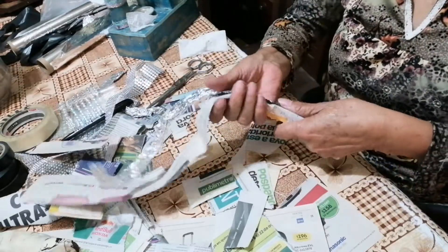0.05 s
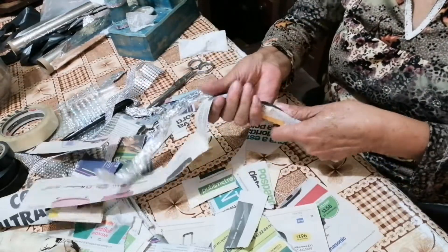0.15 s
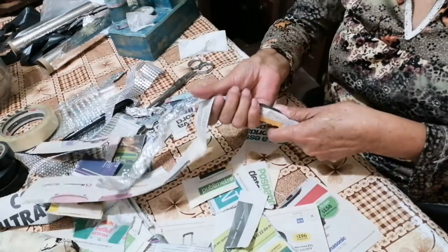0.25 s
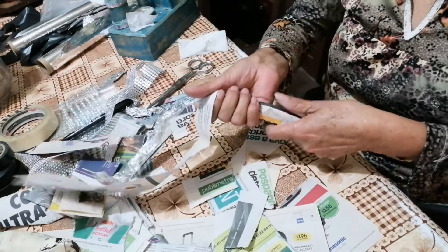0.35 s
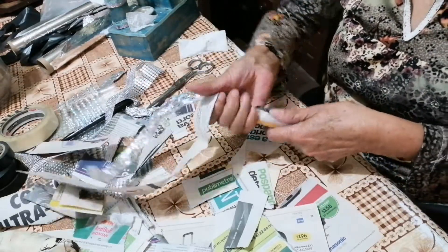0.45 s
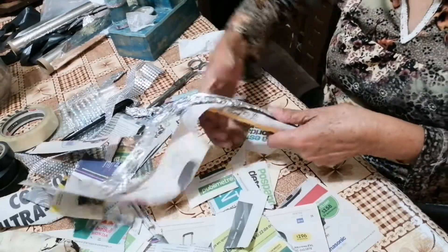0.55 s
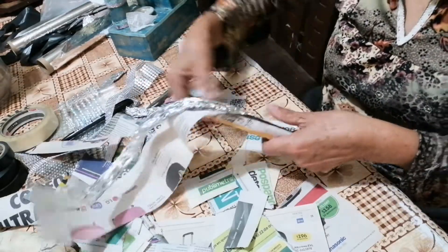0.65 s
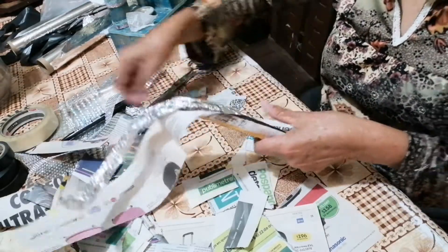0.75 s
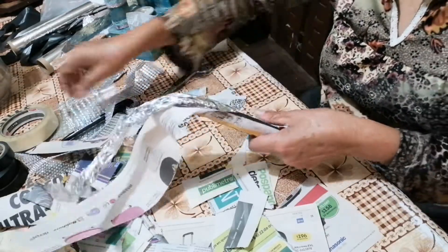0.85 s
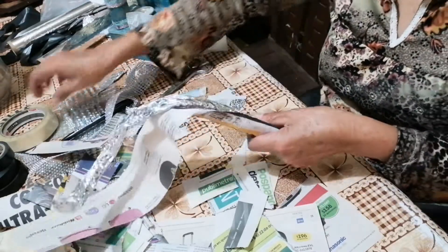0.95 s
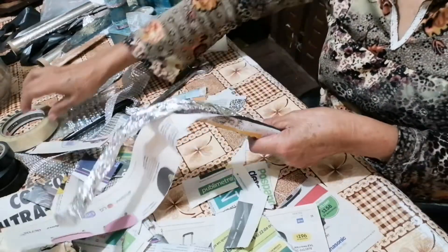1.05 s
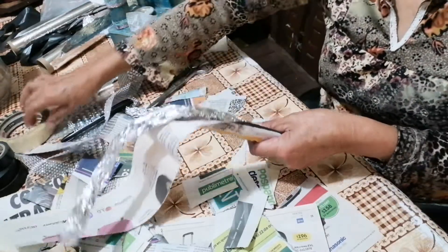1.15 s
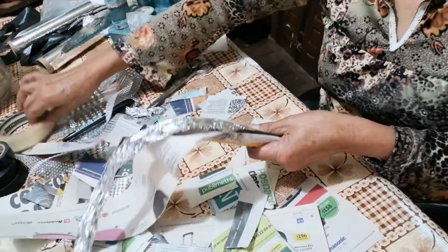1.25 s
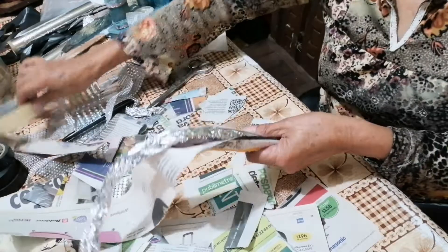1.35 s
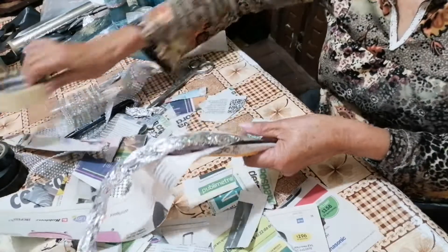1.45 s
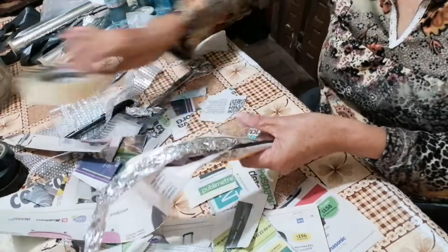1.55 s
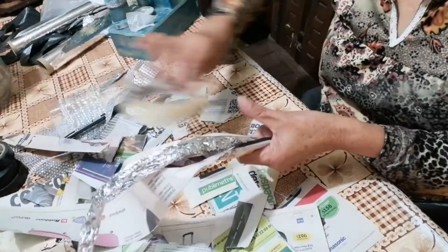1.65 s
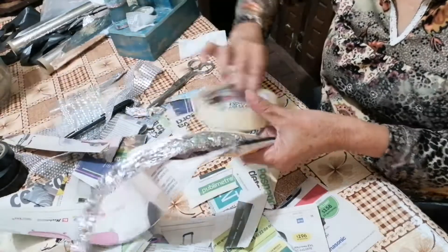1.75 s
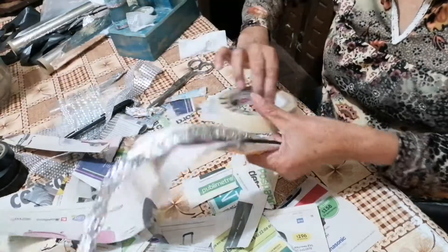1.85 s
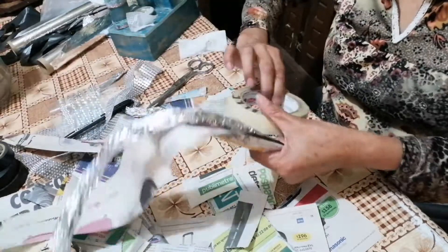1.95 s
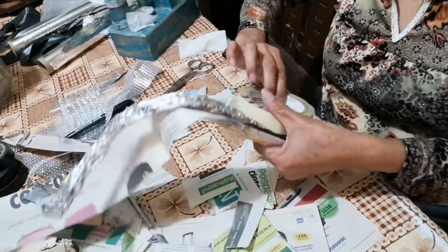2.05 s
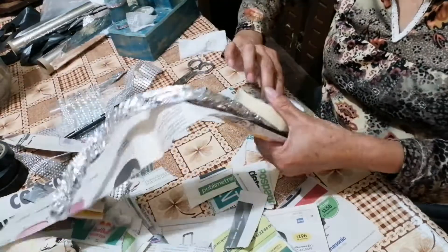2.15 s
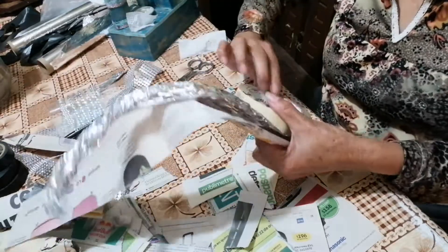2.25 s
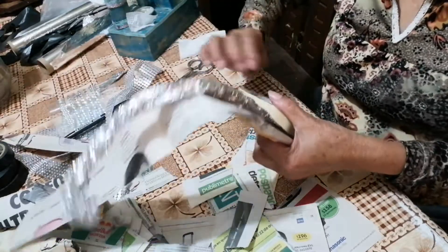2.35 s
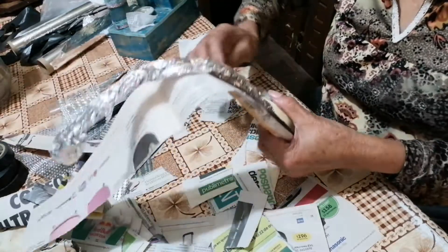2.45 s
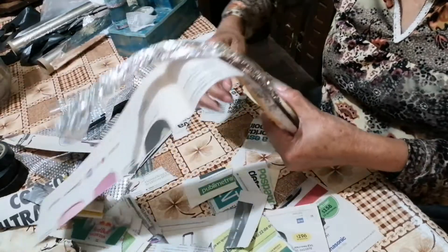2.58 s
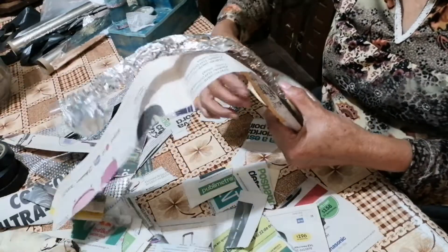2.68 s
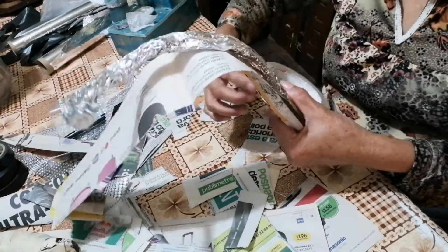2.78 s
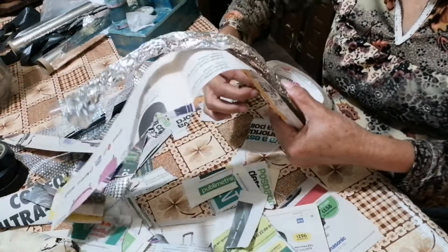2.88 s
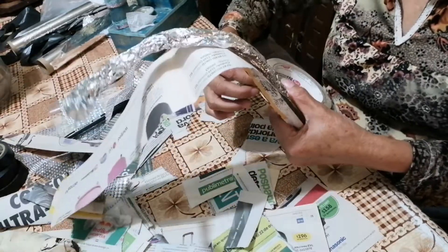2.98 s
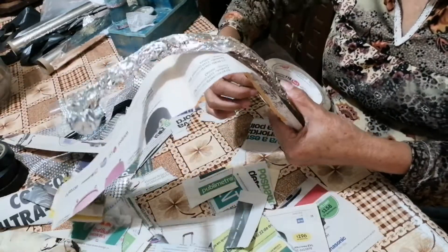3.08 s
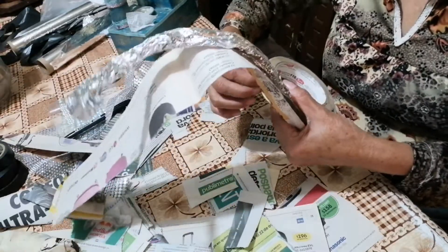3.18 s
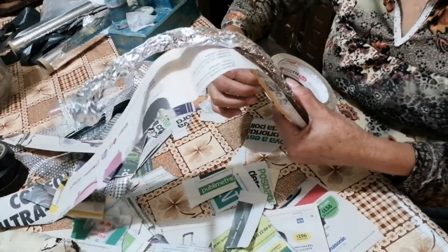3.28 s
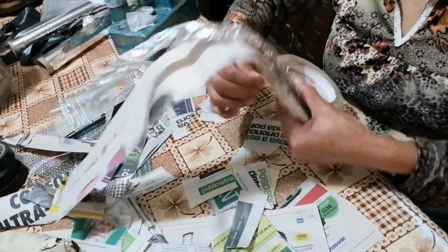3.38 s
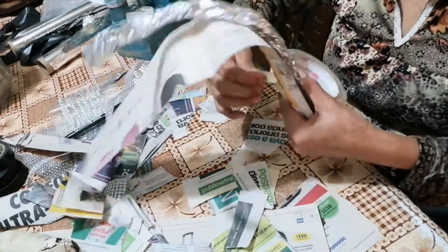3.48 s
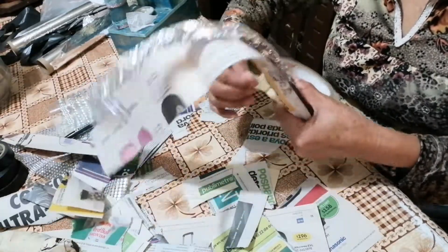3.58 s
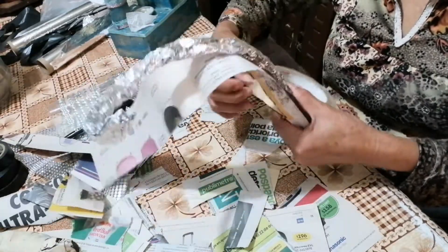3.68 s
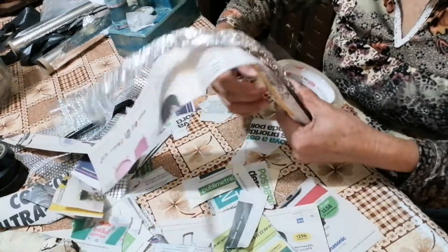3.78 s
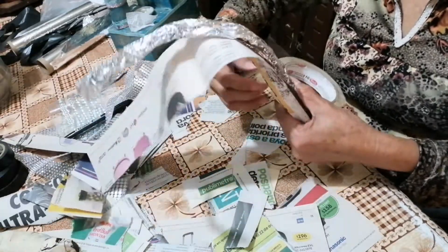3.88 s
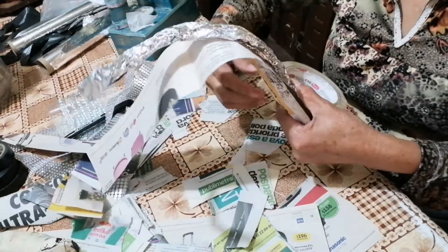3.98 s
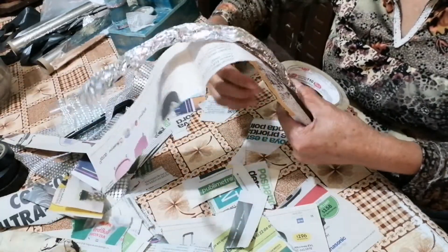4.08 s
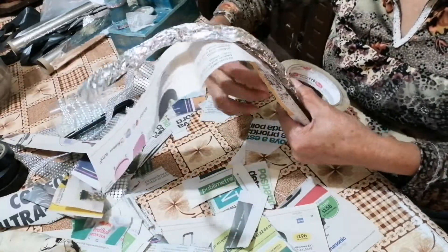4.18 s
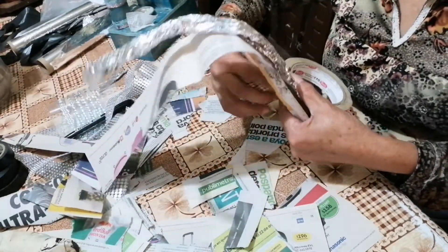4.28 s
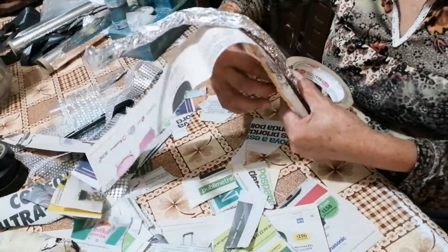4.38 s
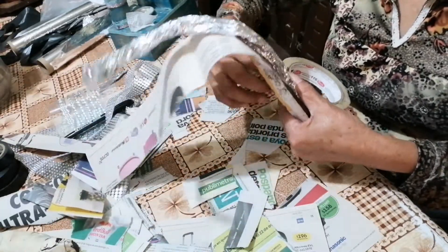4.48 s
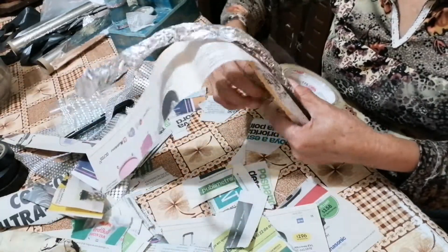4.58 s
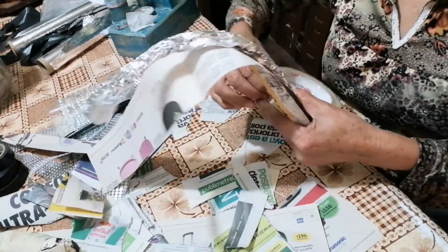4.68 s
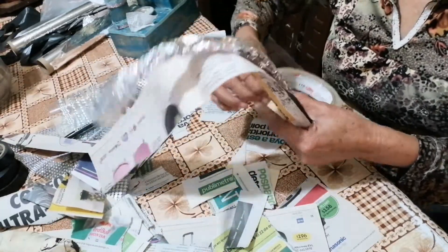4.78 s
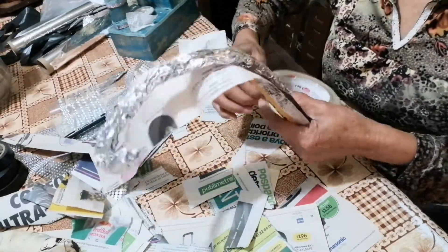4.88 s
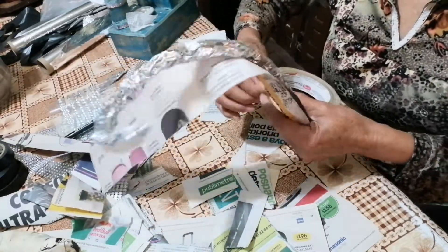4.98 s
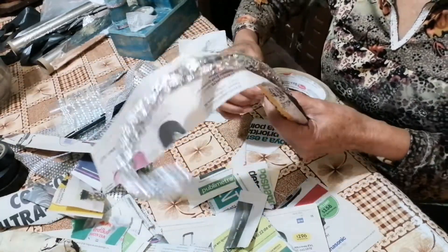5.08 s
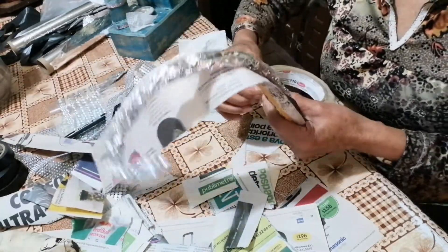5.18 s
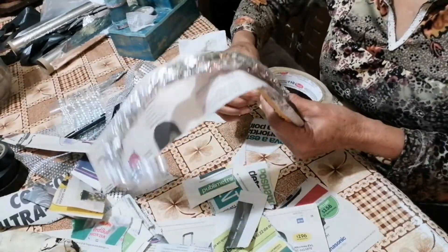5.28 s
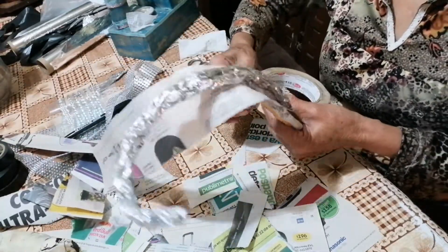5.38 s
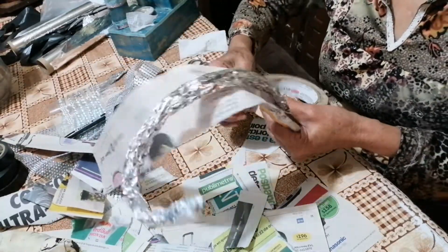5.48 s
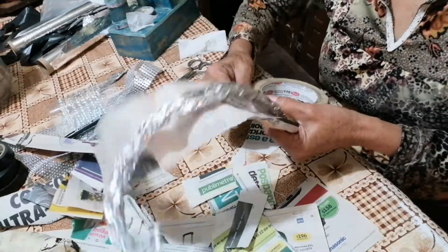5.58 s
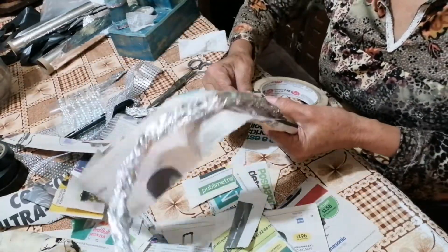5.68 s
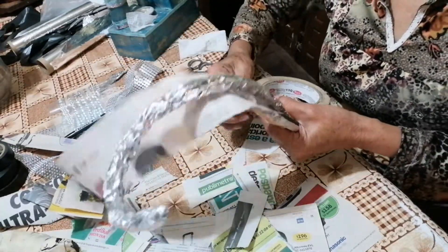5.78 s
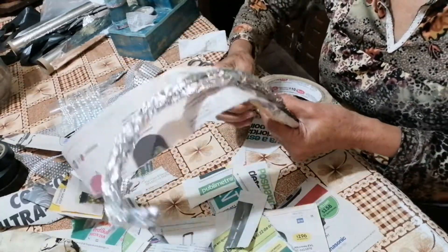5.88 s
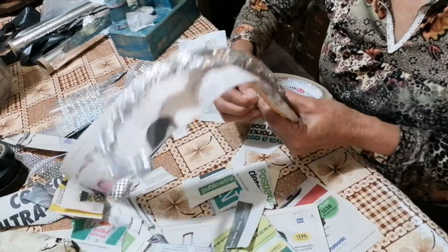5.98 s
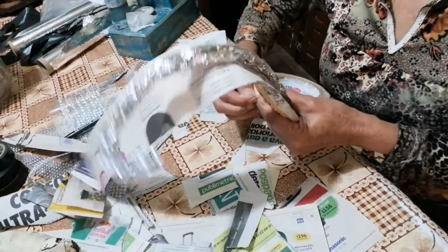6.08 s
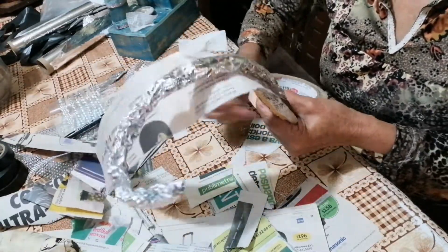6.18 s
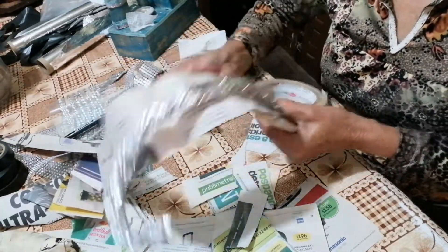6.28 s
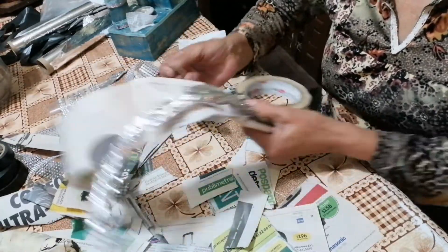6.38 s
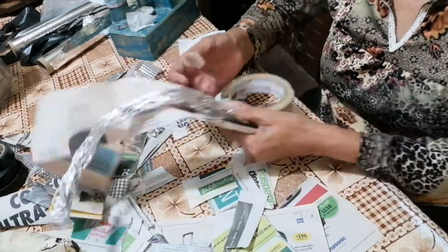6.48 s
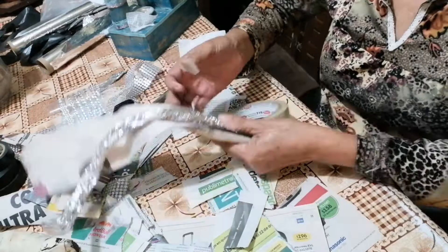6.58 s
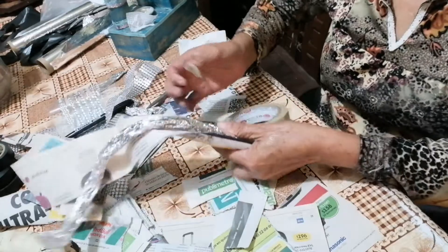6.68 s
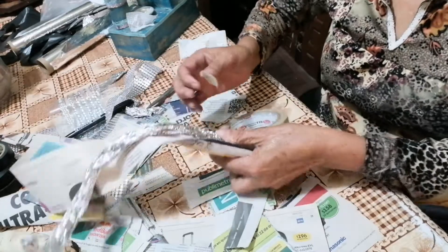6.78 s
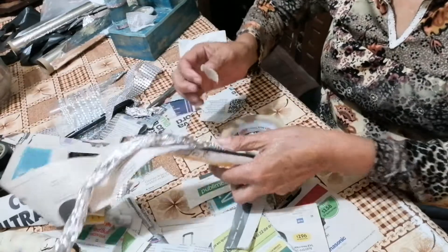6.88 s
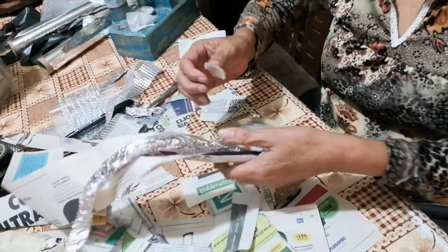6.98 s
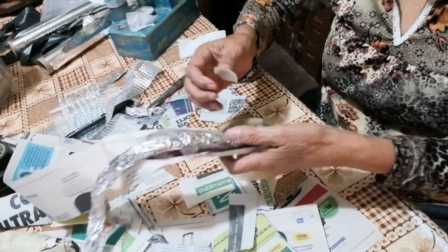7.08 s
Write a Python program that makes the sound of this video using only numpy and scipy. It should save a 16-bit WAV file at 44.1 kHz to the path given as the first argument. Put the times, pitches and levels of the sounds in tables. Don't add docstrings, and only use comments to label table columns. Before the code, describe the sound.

Paper and crinkly foil rustle and snap in close bursts, a tape roll knocks and briefly hums on the table, then hard thuds end it.

```python
import sys
import numpy as np
from scipy import signal
from scipy.fft import rfft, irfft, next_fast_len
from scipy.io import wavfile
from scipy.ndimage import uniform_filter1d

SR = 44100
rng = np.random.default_rng(int(sys.argv[2]) if len(sys.argv) > 2 else 0)


def how_loud(loudness_db):
    steps = np.asarray(loudness_db, float) / 20
    return 10 ** steps


def store_pcm(level_fs):
    pcm = np.round(np.clip(level_fs, -1, 1) * 32767).astype(np.int16)
    wavfile.write(sys.argv[1], SR, np.atleast_2d(pcm).T)


N = 314874
SIZE = next_fast_len(N + SR)
HZ = np.maximum(np.arange(SIZE // 2 + 1) * SR / SIZE, 1.0)
CONTROL_STEP = 32


def paper(flap, crackle, fizz, edge):
    low = band(flap, 670, 3830) + band(crackle, 4030, 7180)
    return low + band(fizz, 7620, 12950) + band(edge, 10060, 17000)


def rustle():
    crackle_db, flap_db, fizz_db, edge_db, flap_hz = handling()
    swarm = grains(1100, 3.5, length_s=0.0008, hiss=0.5) * how_loud(1.4 * walk(22))
    ranges = []
    for noise in ports((4, N), unlike=1.0):
        own_creases = 0.63 * grains(120, 4.0, length_s=0.004, hiss=0)
        ranges.append(level((swarm + own_creases) * noise, 0))
    flap, crackle, fizz, edge = ranges
    sheet = 0
    for hz in 800 * 2 ** np.arange(0, 2.7, 0.5):
        gain_db = 2 * walk(20) - 5 * np.log2(hz / flap_hz) ** 2
        sheet = sheet + how_loud(gain_db) * ring(flap, hz, 0.7 * hz)
    folds = sum(how_loud(2.4 * walk(14)) * ring(crackle, hz, 1600) for hz in (4800, 5600, 6500, 7400))
    sheet = sheet * how_loud(flap_db + 5)
    fizz = fizz * how_loud(fizz_db + 1.5 + 0.93 * walk(27))
    edge = edge * how_loud(edge_db + 4 + 2 * walk(11))
    return how_loud(crackle_db) * paper(sheet, folds * how_loud(-4), fizz, edge)


# (t/s, level/dB at the peak, rise/s, fall/s, f/Hz of the sheet); times are for 20 dB
PRESSES = [(.002, -41, 0.07, 0.14, 2400), (0.284, -48.5, 0.33, 0.29, 2250),
           (0.491, -41.5, 0.093, 0.24, 2330), (1.169, -41.5, 0.063, 0.096, 1200),
           (1.331, -43, 0.13, 0.16, 1300), (1.79, -57, 0.038, 1, 1510), (2.02, -50, 0.068, .6, 2700),
           (2.095, -42, 0.02, 0.21, 2500), (2.42, -61.5, 0.052, 0.078, 2350),
           (2.704, -53, 0.11, 0.088, 2120), (3.402, -34, 0.023, 0.14, 2330),
           (3.574, -42.5, 0.0089, 0.29, 1700), (3.857, -46.5, 0.31, 0.079, 1700),
           (3.95, -60.5, 0.34, 0.017, 1490), (0.671, -54, 0.13, .03, 1900), (4.801, -53.5, 0.24, 1, 2500),
           (5.125, -42, 0.019, 0.096, 2820), (5.237, -41.5, 0.0067, 0.17, 1600),
           (5.4, -67, 0.24, 0.49, 2200), (6.55, -54, 0.25, 0.15, 1700), (6.85, -56, 0.94, 0.58, 1100)]
# (t/s, level/dB at the peak, rise/s, fall/s)
PINCHES = [(1.1, -56, 0.46, 0.27), (1.773, -54.5, 0.33, 0.12), (2.8, -60, 0.0057, 0.065),
           (4.295, -61.5, 0.31, 0.16), (4.484, -61, 0.013, 0.2), (4.7, -65.5, 0.56, 0.6),
           (5.66, -52, .03, .06), (5.72, -54, .03, .08), (5.78, -54, .04, .1), (5.825, -50, .005, .08),
           (5.862, -51, .05, .05), (6.535, -46, .12, .12), (6.147, -34, 0.0055, 0.12),
           (6.184, -29, 0.039, 0.084), (6.33, -51, 0.12, 1)]
# (t/s, level/dB at the peak, rise/s, fall/s)
BENDS = [(.06, -47.5, 0.5, 0.031), (.5, -44, 0.086, 0.13), (.75, -74, .2, 0.87), (3.0, -69.5, 0.79, 0.38),
         (3.368, -49.5, 0.2, 0.11), (3.41, -33, 0.054, 0.028), (5.11, -55, 0.13, 0.013),
         (5.72, -77, .02, .2), (5.975, -56, 0.01, 0.16), (4.85, -56, .15, .3), (5.09, -56, .1, .03)]
# (t/s, level/dB at the peak, rise/s, fall/s, f/Hz of the sheet)
FLAPS = [(0.161, -50, 0.066, 0.033, 2800), (1.89, -58.5, 0.083, 0.13, 1800), (1.16, -47, 0.017, 0.15, 1200),
         (4.92, -56.5, 0.052, 0.3, 1860), (6.19, -47.5, 0.049, 0.11, 3500), (1.172, -50.5, .04, .1, 1200),
         (5.6, -57, 0.026, 0.19, 1900), (3.46, -45.5, 0.034, 0.044, 2700),
         (3.85, -49.5, 0.096, 0.096, 1000), (1.8, -58, .03, .15, 1500), (6.39, -51, .06, .06, 1800),
         (6.455, -44.5, .05, .08, 2600), (6.525, -49, .03, .08, 1300), (6.56, -45, .015, .05, 2000),
         (5.66, -57, .02, .06, 2900), (6.64, -59, .03, 1, 1400), (7.12, -56, 0.28, 0.21, 570)]


def handling():
    press_db, pinch_db = (-1, -6.5, -8.5, -10.5), (-2, -22, -9.5, -10.5)
    bend_db, flap_db = (-12, -33, -2.5, -1.5), (-19, 1.5, -21, -24)
    kinds = [(PRESSES, press_db), (PINCHES, pinch_db), (BENDS, bend_db), (FLAPS, flap_db)]
    power = sum(swells(moves).sum(axis=0) * how_loud(2 * np.array(db))[:, None] for moves, db in kinds)
    crackle, flap, fizz, edge = (envelope(p, -81) for p in power)
    share = np.vstack([swells(PRESSES) * how_loud(2 * press_db[1]), swells(FLAPS)]) + 1e-30
    pitches = np.array([move[4] for move in PRESSES] + [move[4] for move in FLAPS])
    hz = pitches @ share / share.sum(axis=0)
    flap_hz = np.interp(np.arange(N) / CONTROL_STEP, np.arange(len(hz)), hz)
    return crackle, flap - crackle, fizz - crackle, edge - crackle, flap_hz


def snaps():
    count = 768
    out, t_ms = np.zeros((4, 2, N + count)), np.arange(count) / SR * 1000
    rows = creases()
    for row, noise in zip(rows, ports((len(rows), 4, count), unlike=0.65)):
        s, db, fold_hz, flap_db, flap_hz, fizz_db, ms = row
        puff = noise * t_ms / ms * np.exp(1 - t_ms / ms)
        energy = np.sum(puff ** 2, axis=-1, keepdims=True)
        flap, fold, fizz, edge = puff / np.sqrt(energy / (20 * ms / 0.4))
        flap = 0.42 * (0.4 / ms) ** 2 * flap + ring(flap, flap_hz, flap_hz)
        fold = 0.35 * fold + ring(fold, fold_hz, 1350)
        parts = [flap * how_loud(flap_db + 17), fold * how_loud(-1.5), fizz * how_loud(fizz_db + 14), edge * how_loud(fizz_db + 7)]
        start = int(s * SR)
        out[..., start:start + count] += how_loud(db) * np.array(parts)
    return paper(*out[..., :N])


# (t/s, level/dB at the peak, f/Hz of the fold, foil fizz level/dB relative)
SNAPS = [(0.075, -29, 5600, -26), (0.1478, -31, 6030, -12), (0.1502, -33, 5220, -15),
         (0.2576, -38.5, 6100, -24), (0.2766, -24, 6100, -19.5), (0.279, -26, 5140, -37),
         (0.4614, -39, 6700, -28), (0.5236, -30.5, 6340, -27), (1.294, -26, 6060, -38),
         (1.3914, -32.5, 5740, -18.5), (2.0992, -23, 6030, -19.5), (2.7102, -36.5, 6150, -23),
         (4.4848, -31, 4530, -32), (4.733, -53, 6000, -3), (5.1255, -16, 5300, -14),
         (5.2384, -18, 4860, -16.5), (5.3017, -26, 5600, -16), (5.4094, -42, 5530, -14.5),
         (5.8227, -46, 5840, -10), (.4902, -38, 6480, -25), (5.8581, -44, 5670, -20)]
# (t/s, level/dB at the peak, f/Hz of the fold, fizz level/dB relative)
NICKS = [
    (2.796, -16, 5130, -42),
    (3.3702, -36, 6720, -22),
    (6.0364, -31, 6500, -20),
    (6.6199, -15, 5200, -25),
]
# (t/s, level/dB at the peak, f/Hz of the sheet, flap level/dB relative)
POPS = [(0.124, -45, 2190, -11), (0.3491, -42, 2160, -10), (0.4475, -41, 2120, -5),
        (1.1495, -37.5, 1200, -9.5), (1.3199, -37, 1340, -17), (1.332, -36, 2000, -14),
        (3.5703, -41, 2830, -6.5), (3.7987, -42, 1740, -8), (6.347, -40.5, 1770, -15),
        (6.6203, -24, 2200, -6), (6.9273, -36, 2900, -8), (6.9366, -34, 2900, -8), (7.0187, -42.5, 950, 0)]
# (t/s, level/dB at the peak)
TICKS = [(1.7766, -52), (3.03, -61.5), (3.25, -61), (3.2856, -56), (3.3187, -62), (2.058, -53),
         (5.042, -58), (5.079, -57), (5.097, -54), (6.0395, -50), (5.7155, -48), (5.971, -49),
         (5.9833, -54), (6.0117, -48), (6.0197, -44)]
# (t/s, level/dB at the peak, length/ms, f/Hz of the sheet, flap level/dB relative)
CRUNCHES = [(.672, -44, 2.5, 1210, -20), (1.866, -52, 2.5, 980, -6), (1.887, -48, 2, 1740, -14),
            (1.928, -52, 1.2, 900, -4), (2.056, -46, 2.5, 2660, -16), (4.298, -54, 2.5, 2500, -16),
            (4.92, -50, 2.5, 2600, 0), (5.594, -56, 2.5, 1550, 4), (.1655, -42, 1, 2600, -13),
            (.174, -42, 1, 2560, -18), (0.2707, -44.5, 1, 2500, -5), (0.2777, -34, 1, 1830, -8.5),
            (0.1482, -40, 1.1, 2410, -7), (3.386, -38, 2, 2600, -22), (3.398, -29.5, 2, 2500, -12),
            (3.404, -29, 2.1, 2300, -9.5), (3.411, -31.5, 1.7, 2100, -6), (3.4364, -39, 1.8, 2200, -10),
            (3.584, -36, 2.2, 1200, -9), (3.733, -47, 2, 1800, -20), (3.747, -33.5, 1.5, 1900, -20.5),
            (3.8478, -37.5, 1.5, 1500, -19), (3.857, -42, 1.5, 1200, -16), (6.148, -29, 1.5, 3000, -30),
            (6.157, -25.5, 1.6, 3400, -27), (6.174, -27, 1.6, 3300, -22), (6.1867, -23, 1, 3320, -20),
            (6.1905, -26, 1, 3300, -22), (6.197, -24, 1.3, 2810, -19.5), (6.2046, -24.5, 1.1, 3000, -20),
            (6.211, -33, 1.2, 3000, -20)]


def creases():
    sheet_hz, quick_ms = 2500, 0.4
    rows = [(s, db, hz, -23, sheet_hz, fizz_db, quick_ms) for s, db, hz, fizz_db in SNAPS]
    rows += [(s, db, hz, -40, sheet_hz, fizz_db, quick_ms) for s, db, hz, fizz_db in NICKS]
    rows += [(s, db, 5920, flap_db, hz, -15, quick_ms) for s, db, hz, flap_db in POPS]
    rows += [(s, db, 7000, -20, sheet_hz, 2, quick_ms) for s, db in TICKS]
    rows += [(s, db, 5860, flap_db, hz, -15, ms) for s, db, ms, hz, flap_db in CRUNCHES]
    return rows


# (start t/s, length/s, from f/Hz, to f/Hz, level/dB)
SWISHES = [
    (5.968, .12, 15000, 6000, -57),
    (3.24, .15, 12500, 8000, -57),
]


def swish():
    out = np.zeros((2, N))
    for s, length_s, from_hz, to_hz, db in SWISHES:
        count = int(length_s * SR)
        u = np.arange(count) / count
        centre_hz = to_hz * (from_hz / to_hz) ** ((1 - u) ** 1.3)
        noise = ports((count,), unlike=0.9) * grains(900, 3.5, length_s=0.0008, hiss=0.4)[:count]
        hiss = 0
        for hz in 5500 * 2 ** np.arange(0, 1.6, 0.25):
            gain_db = -60 * np.log2(hz / centre_hz) ** 2 + 5 * np.log2(hz / 8000)
            hiss = hiss + how_loud(gain_db) * ring(noise, hz, 0.3 * hz)
        start = int(s * SR)
        out[:, start:start + count] = level(hiss * np.minimum(u / 0.05, 1) * (1 - u) ** 0.5, db)
    return out


# (t/s, level/dB at the peak, centre f/Hz of the ringing, spread/octaves, slap level/dB relative)
KNOCKS = [(1.229, -25, 290, 0.5, -10), (1.24, -19, 389, 0.35, -25), (1.238, -24, 65, 0.31, -42),
          (1.236, -28.5, 152, 0.34, -28), (1.441, -35, 150, 0.28, -16), (1.331, -40.5, 1220, 0.18, 0.5),
          (1.6, -45, 202, 1.17, -5.5), (1.924, -53, 810, 0.18, 7), (2.098, -51, 830, 0.2, 12.5),
          (6.6205, -23, 424, 1.21, -2), (6.928, -14, 365, 0.85, -9), (7.018, -15, 318, 0.68, -12),
          (7.045, -24, 330, 0.5, -14), (7.071, -24.5, 400, 0.86, -5), (6.937, -27, 500, .8, -8),
          (2.6, -43, 405, 0.22, -30)]
# (f/Hz, level/dB, time to fall 60 dB/s)
TABLE = [(65, -9, 0.37), (137.2, 8, 0.17), (187.8, -2.5, 0.17), (242.5, 2.5, 0.12), (267.6, -8.5, 0.34),
         (314, -2.5, 0.28), (348, 5, 0.085), (412.7, -6, 0.17), (476.8, 1, 0.17), (542, -6.5, 0.46),
         (560.5, -5.5, 0.17), (640, 3.5, 0.083), (694, -5, 0.05), (815, 1, 0.45), (955, 5.5, 0.31),
         (1033, -4, 0.14), (1210, 20, 0.023), (1328, 9, 0.11)]


def knocks():
    out, t = np.zeros((2, N + SR)), np.arange(SR // 2) / SR
    chances = rng.standard_normal((len(KNOCKS), len(TABLE), 3))
    for (s, db, centre_hz, octaves, slap_db), chance in zip(KNOCKS, chances):
        noise = ports(t.shape, unlike=0.78)
        rise_ms = np.clip(1.8 + 1.3 * (-2.5 - slap_db), 1.8, 8.5)
        slap = band(noise, 400, 1500) * how_loud(-60 * t / 0.4)
        slap += band(noise, 1530, 3100) * how_loud(-10 - 60 * t / 0.22)
        slap += band(noise, 230, 3500) * how_loud(-0.5 - 60 * t / 0.013)
        blow = slap * how_loud(slap_db) * (1 - np.exp(-t / 0.00087))
        for (hz, mode_db, t60), (gain, shift, phase) in zip(TABLE, chance):
            t60 = min(t60, 140 / hz)
            reach_db = -6 * (np.log2(hz / centre_hz) / max(octaves, 0.2)) ** 2
            swell = 1 - np.exp(-t * hz * 5 / rise_ms)
            tone = np.sin(2 * np.pi * (hz * (1 + 0.005 * shift) * t + phase)) * how_loud(1.2 * gain)
            blow += swell * tone * how_loud(mode_db - 10 + reach_db - 60 * t / t60)
        start = int(s * SR)
        out[:, start:start + len(t)] += blow * how_loud(db)
    return out[:, :N]


# (t/s, level/dB at the peak, period/ms)
CONTACTS = [
    (1.2292, -34, 3),
    (6.6199, -13, 1.1),
    (6.9271, -27, 1.6),
    (6.9364, -14, 1.6),
    (7.018, -27, 1.6),
]


def contacts():
    count = 512
    out, t_ms = np.zeros(N + count), np.arange(count) / SR * 1000
    for s, db, ms in CONTACTS:
        start = int(s * SR)
        swing = np.sin(2 * np.pi * t_ms / ms) * np.exp(0.36 - t_ms / (0.7 * ms))
        out[start:start + count] -= how_loud(db) * swing
    return signal.sosfilt(signal.butter(1, 300, "high", fs=SR, output="sos"), out[:N])


# (t/s, f/Hz, level/dB)
SINGS = [
    (2.12, 460.6, -68),
    (2.14, 460.8, -59),
    (2.21, 460.7, -51),
    (2.218, 452, -61.5),
    (2.25, 467.4, -48),
    (2.284, 476.7, -64),
    (2.378, 477, -68),
    (2.408, 450, -61),
    (2.42, 465, -78.5),
]


def singing_roll():
    s, hz, db = np.transpose(SINGS)
    t = np.arange(N) / SR
    phase = 2 * np.pi * np.cumsum(np.interp(t, s, hz)) / SR
    return np.sqrt(2) * np.sin(phase) * how_loud(np.interp(t, s, db, left=-150, right=-150) - 1)


# (t/s, level/dB at the peak, rise/s, fall/s)
LEANS_LOW = [
    (.4, -66.5, .8, 0.29),
    (5.5, -65.5, 0.18, 0.33),
    (.8, -59, 0.3, 0.61),
    (1.45, -63, 0.81, .7),
    (2.35, -70.5, 0.22, 0.33),
    (5.9, -66.5, 0.66, 1.6),
    (7.1, -64, 7.5, 0.8),
]
# (t/s, level/dB at the peak, rise/s, fall/s)
LEANS_HUM = [
    (1.45, -58.5, .6, 0.77),
    (2.85, -62, 1.8, 1.04),
    (4.08, -59, 0.25, 0.39),
    (5.9, -63, 1, 1.05),
    (7.12, -59, 1.8, 1.3),
]
# (t/s, level/dB at the peak, rise/s, fall/s)
DRAGS = [
    (.5, -66, 0.24, 0.74),
    (.8, -64.5, 1, 0.22),
    (1.6, -80, .9, 1.9),
    (2.35, -60.5, 0.32, 0.12),
    (2.95, -79, 0.29, 0.68),
    (3.88, -68, 0.77, 0.15),
    (6.45, -66, 0.33, 4.4),
]
# (t/s, level/dB at the peak, rise/s, fall/s)
ROCKS = [
    (.85, -63, 1.1, 0.11),
    (1.33, -49.5, .03, 0.28),
    (2.32, -62, 0.11, .1),
]
# (f/Hz, width/Hz, level/dB)
HUM = [(171.4, 34, -0.5), (191.9, 58, -1.5), (225, 77, -6.5)]
# (f/Hz, width/Hz, level/dB)
DRAG = [(393, 174, 1.5), (568, 134, 4), (649, 72, -3)]


def table_load():
    low_db, hum_db, drag_db = (envelope(swells(moves).sum(axis=0), rest_db) for moves, rest_db in
                               ((LEANS_LOW, -82.5), (LEANS_HUM, -71), (DRAGS, -85)))
    low, hum, rock, drag = ports((4, N), unlike=0.71)
    low = level(resonate(low, [(98.5, 29.5, 3), (54, 30, 0)]), 0) * how_loud(low_db + 1.2 * walk(3.2))
    hum = level(resonate(hum, HUM), 0) * how_loud(hum_db + 2.5 * walk(14))
    rock_power = swells(ROCKS).sum(axis=0)[:N // CONTROL_STEP + 1]
    rock_power = np.interp(np.arange(N) / CONTROL_STEP, np.arange(len(rock_power)), rock_power)
    rock = level(ring(rock, 469.3, 34), 0) * np.sqrt(rock_power)
    drag = level(resonate(drag, DRAG), 0) * how_loud(drag_db + 0.6 * walk(12))
    return low + hum + rock + drag


def room(x):
    bass_t60_s, treble_t60_s = 0.36, 0.21
    t = np.arange(int(0.6 * SR)) / SR
    noise = ports(t.shape, unlike=0.94)
    low = band(noise, 43, 940) * how_loud(-60 * t / bass_t60_s)
    high = band(rng.standard_normal(noise.shape), 620, 19600) * how_loud(-0.5 - 60 * t / treble_t60_s)
    tail = (low + high) * np.clip(t / 0.00025, 0, 1)
    return irfft(rfft(x, SIZE) * rfft(tail, SIZE), SIZE)[:, :N]


# (f/Hz, level/dB)
AIR = [(20, -2), (60, -3.5), (150, -18), (400, -8.5), (1000, -10), (3000, -16), (8000, -34), (16000, -18)]


def air():
    shared, own = rng.standard_normal(N), rng.standard_normal((2, N))
    return level(colour(band(shared, 29, 790) * 1.19 + own, AIR), -68.5) * how_loud(0.19 * walk(3.37))


def level(x, db):
    return x * how_loud(db) / np.sqrt(np.mean(x ** 2))


def colour(x, points):
    hz, db = np.transpose(points)
    cepstrum = irfft(np.interp(np.log(HZ), np.log(hz), db) * np.log(10) / 20, SIZE)
    cepstrum[1:SIZE // 2] *= 2
    cepstrum[SIZE // 2 + 1:] = 0
    return irfft(rfft(x, SIZE) * np.exp(rfft(cepstrum)), SIZE)[..., :N]


def band(x, lo_hz, hi_hz):
    return signal.sosfilt(signal.butter(3, [lo_hz, hi_hz], "band", fs=SR, output="sos"), x)


def ring(x, hz, width):
    b, a = signal.iirpeak(hz, hz / width, fs=SR)
    return signal.lfilter(b, a, signal.lfilter(b, a, x))


def resonate(x, modes):
    return sum(how_loud(db) * ring(x, hz, width) for hz, width, db in modes)


def walk(rate):
    k = int(SR / rate)
    held = np.repeat(rng.standard_normal(N // k + 1), k)
    return 1.3 * uniform_filter1d(uniform_filter1d(held, k), k)[:N]


def ports(shape, unlike):
    noise = rng.standard_normal((*shape[:-1], 3, shape[-1]))
    return (noise[..., :1, :] + unlike * noise[..., 1:, :]) / np.sqrt(1 + unlike ** 2)


def grains(rate, spread_db, length_s, hiss):
    chance = rng.random((2, N))
    sizes = (chance[0] < rate / SR) * how_loud(-spread_db * np.log(chance[1] + 0.02))
    return level(signal.lfilter([1], [1, -np.exp(-1 / (length_s * SR))], sizes), 0) + hiss


def swells(moves):
    s, db, rise, fall = np.array(moves)[:, :4].T[..., None]
    late = np.arange(0, N + CONTROL_STEP, CONTROL_STEP) / SR - s
    return how_loud(2 * (db - 20 * np.maximum(late / fall, -late / rise)))


def envelope(power, rest_db):
    db = 10 * np.log10(power + how_loud(2 * rest_db))
    return np.interp(np.arange(N) / CONTROL_STEP, np.arange(len(power)), db)


def scene():
    cracks, swarm, blows = snaps(), rustle() + swish(), knocks() + contacts()
    direct = cracks + swarm + blows
    direct[0] = np.roll(direct[0], 5)
    wet = room((how_loud(-35) * cracks + how_loud(-30.5) * swarm + how_loud(-33) * blows).mean(axis=0))
    return direct + wet + table_load() + singing_roll() + air()


def low_pass(x):
    return signal.sosfilt(signal.butter(12, 15950, fs=SR, output="sos"), x)


# (f/Hz, level/dB)
LEFT = [(20, 5), (1000, 0), (2600, 4), (3900, 4.5), (4500, 6), (5200, 16.5), (6300, 17), (7000, 11.5),
        (7800, 0), (9200, -6), (12500, -9.5), (14900, 0.5), (15700, -30), (16100, -26.5)]
# (f/Hz, level/dB)
RIGHT = [(20, -1), (1000, -2.5), (2800, 2.5), (4100, -1.5), (5000, 6), (7200, 2.5), (8200, 3), (9000, 10),
         (10000, 6), (11000, -4.5), (13500, -5), (14900, -10), (15700, -5), (16100, -39)]


def record(dry):
    mix = np.array([colour(dry[0], LEFT), colour(dry[1], RIGHT)])
    return low_pass(mix)


dry = scene()
out = record(dry)
store_pcm(out)
```